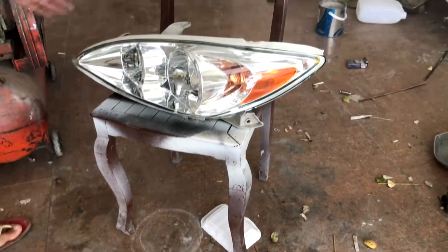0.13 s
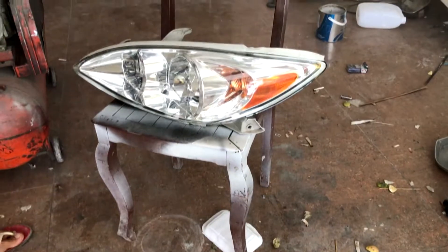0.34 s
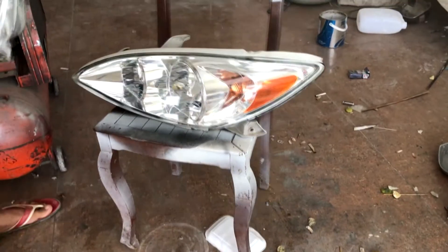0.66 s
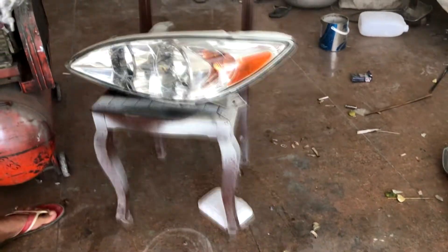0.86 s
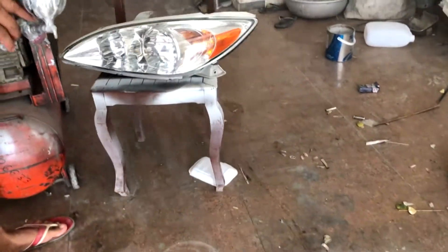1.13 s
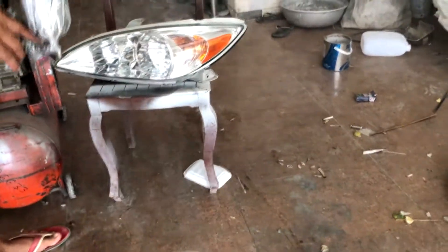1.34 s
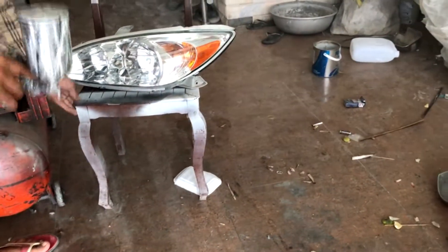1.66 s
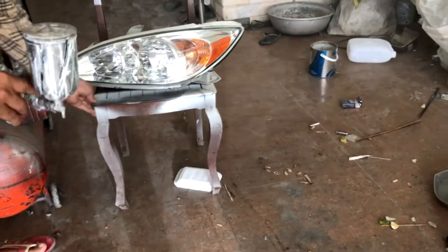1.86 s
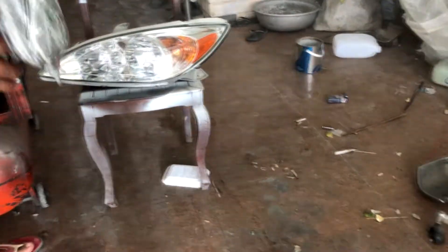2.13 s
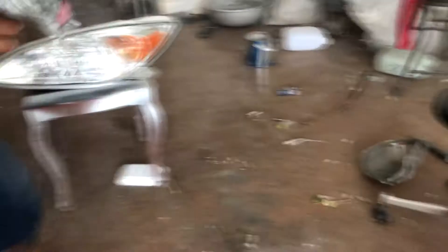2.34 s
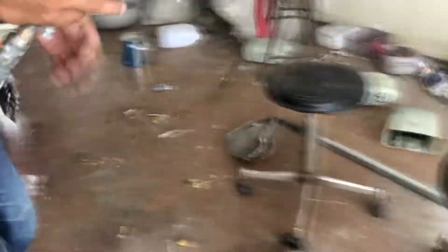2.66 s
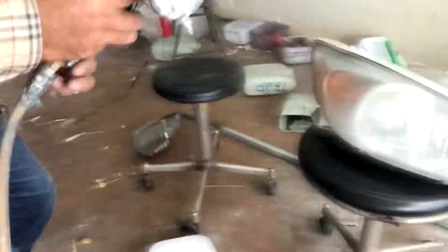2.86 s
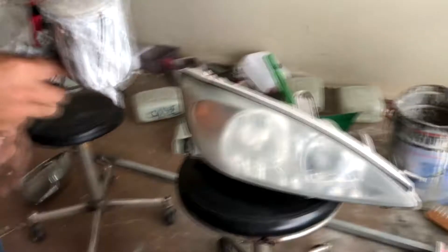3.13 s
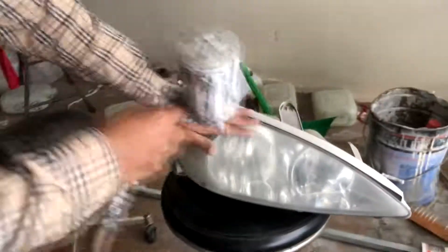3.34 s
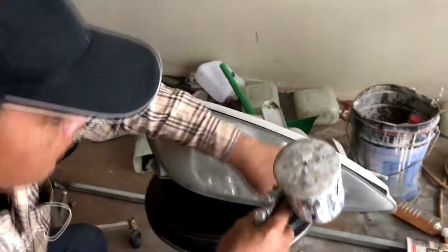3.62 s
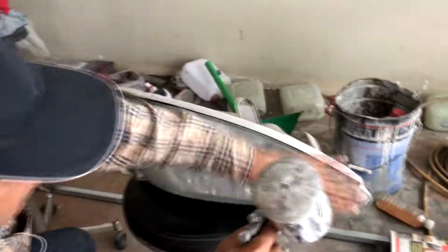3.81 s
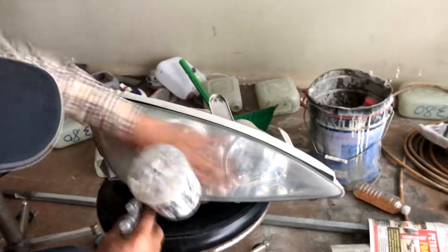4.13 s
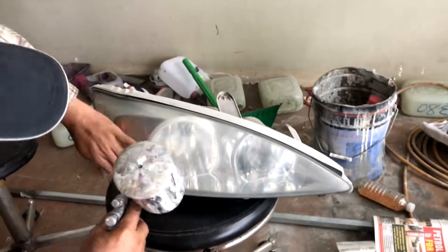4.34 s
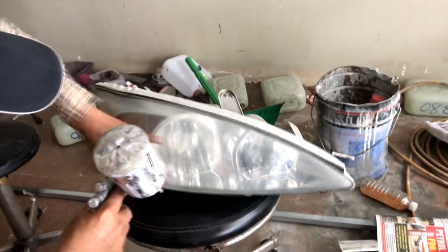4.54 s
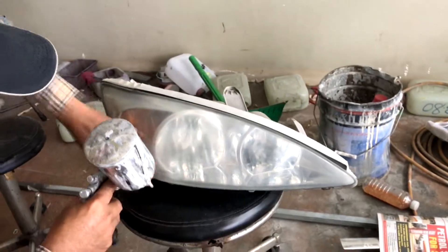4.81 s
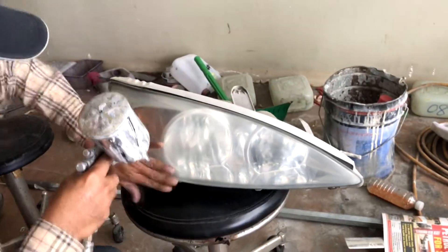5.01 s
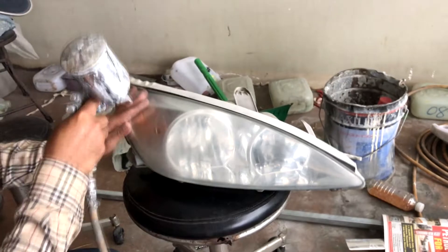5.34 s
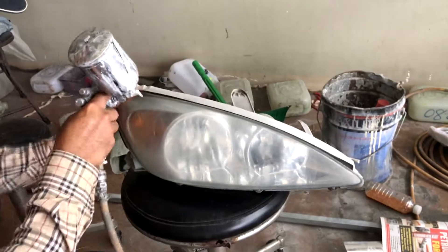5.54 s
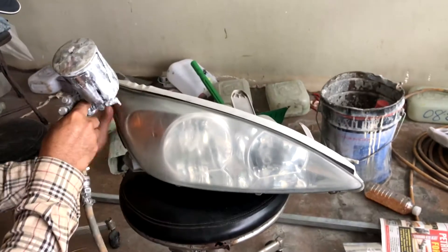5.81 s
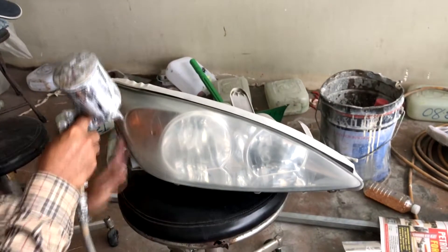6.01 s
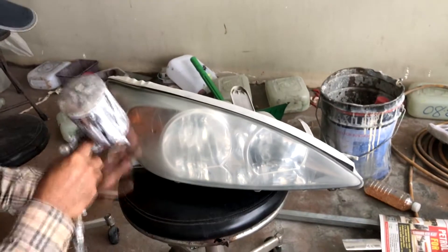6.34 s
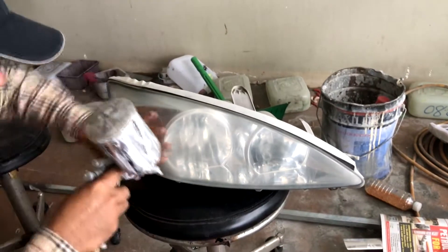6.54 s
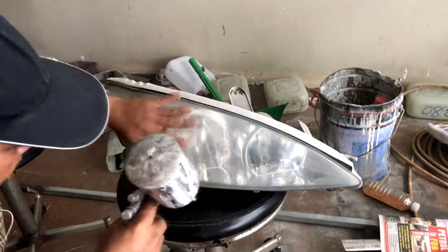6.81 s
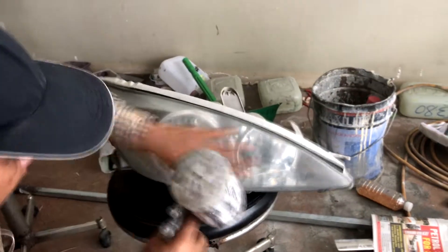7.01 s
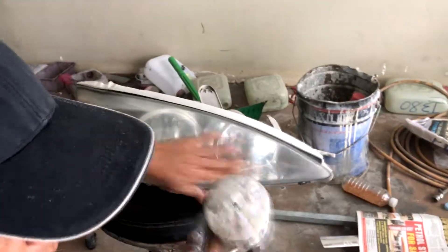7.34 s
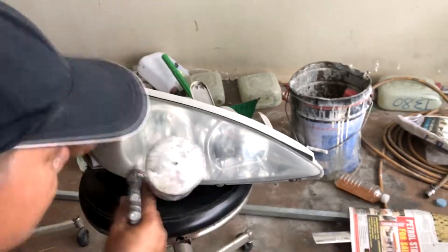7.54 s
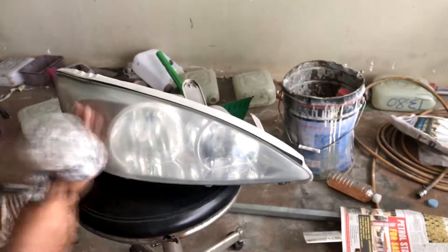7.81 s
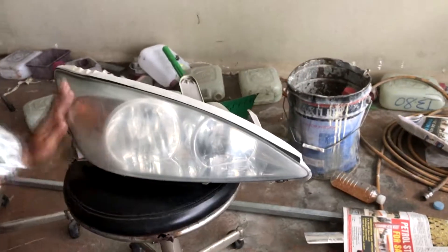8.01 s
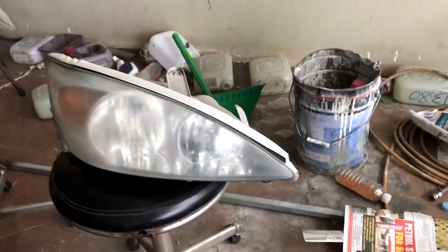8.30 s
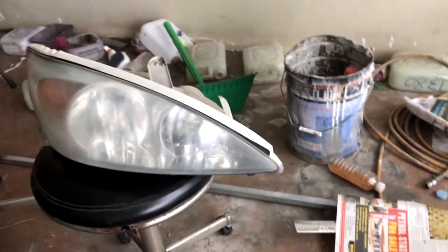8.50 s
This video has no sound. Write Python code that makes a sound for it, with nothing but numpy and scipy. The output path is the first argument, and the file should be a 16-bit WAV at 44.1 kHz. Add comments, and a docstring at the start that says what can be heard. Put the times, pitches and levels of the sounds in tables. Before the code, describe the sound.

A compressed-air spray gun hisses brightly and steadily close to the microphone in a workshop, coating a plastic headlamp lens, with a faint compressor hum and motor whine behind it. At about 2.1 seconds the trigger is released and the air falls away in a hollow sigh to a thin leak. A quiet low drone enters around 2.3 seconds and holds until about 5. At 2.8 seconds the air returns with a short spurt, slightly nearer and brighter, and hisses on to the end near 8.5 seconds, with a faint, high, breathy whistle flaring now and then. An engine outside swells into a low rumble around 3.5 seconds and fades around 6.2. The hiss grows a little fuller as the spray passes over the lens, from about 4 to 5.7 seconds and again from 6.8 seconds.

```python
"""A workshop, close on a compressed-air spray gun that hisses over a plastic headlamp lens; a compressor
hums behind. At 2.1 s the trigger is let go and the air sighs down to a thin leak, while a low drone comes
in and the microphone is carried a little nearer. At 2.8 s the air returns with a spurt, and from then on
the air cap's whistle flares now and then. An engine outside swells around 3.5 s and fades around 6.2 s;
the gun makes two more passes over the lens, from 4 s and from 6.8 s."""
import sys
import numpy as np
from scipy import signal
from scipy.fft import rfft, irfft
from scipy.io import wavfile
from scipy.ndimage import uniform_filter1d

SR = 44100
rng = np.random.default_rng(int(sys.argv[2]) if len(sys.argv) > 2 else 0)


def persist_wave(psi):
    """Save psi, clipped to +-1, as 16-bit WAV."""
    counts = np.round(np.clip(psi, -1, 1) * 32767).astype(np.int16)
    wavfile.write(sys.argv[1], SR, np.atleast_2d(counts).T)


N = 381888
TIME, ALL_HZ = np.arange(N) / SR, np.fft.rfftfreq(N, 1 / SR)
FRAME_S, BIN_HZ = np.arange(N // 128 + 5) * 128 / SR, np.fft.rfftfreq(512, 1 / SR)


def gain_of(db):
    """Decibels to amplitude."""
    return 10 ** (np.asarray(db) / 20)


def unit_rms(x):
    """Scales to rms 1."""
    return x / np.sqrt(np.mean(x ** 2) + 1e-20)


def spectrum_db(points, hz):
    """Reads a spectrum table along a log-frequency axis."""
    freq_hz, level_db = np.transpose(points)
    return np.interp(np.log(hz + 1), np.log(freq_hz), level_db)


def bells_db(rows, hz):
    """The curve of a set of bell-shaped peaks or dips."""
    return sum(db * np.exp(-.5 * ((hz - centre) / width) ** 2) for centre, width, db in rows)


def ease(t, middle_s, length_s):
    """A smooth step from 0 to 1."""
    return .5 + .5 * np.sin(np.pi * np.clip((t - middle_s) / length_s, -.5, .5))


def swell(t, middle_s, length_s):
    """A smooth arch from 0 to 1 and back."""
    return np.cos(np.pi * np.clip((t - middle_s) / length_s, -.5, .5)) ** 2


def noise(gain):
    """Noise of rms 1 with the given spectrum."""
    return unit_rms(irfft(rfft(rng.standard_normal(N)) * gain, N))


def drift(rate_hz):
    """A random wander of rms 1, up to about the given rate."""
    return noise(1 / (1 + (ALL_HZ / rate_hz) ** 2))


def tone(hz):
    """A complex tone that follows a pitch curve; its real part has rms 1."""
    return np.sqrt(2) * np.exp(2j * np.pi * (np.cumsum(hz * np.ones(N)) / SR + rng.random()))


def breathy(hz, width_hz):
    """A resonance blown by turbulence: a tone whose amplitude and phase wander."""
    return unit_rms((tone(hz) * (drift(width_hz / 2) + 1j * drift(width_hz / 2))).real)


def patches(frames, bins):
    """A random field, smoothed over time and frequency."""
    field = rng.standard_normal((len(FRAME_S), len(BIN_HZ)))
    for axis, size in enumerate((frames, bins)):
        field = uniform_filter1d(uniform_filter1d(field, size, axis), size, axis)
    return unit_rms(field)


def mic_position(t):
    """0 at the microphone's first, farther spot, 1 at the nearer one."""
    return ease(t, middle_s=2.55, length_s=.9)


# The bare jet, close up: freq_hz, relative_db
JET_SPECTRUM = [(100, -19), (450, -16), (900, -12.5), (1500, -10), (2100, -8.5), (2800, -4.5), (4200, -0.4),
                (5500, 0.26), (6500, 2.5), (8500, 2), (10000, 1.1), (11800, 0.85), (14000, -0.5),
                (16000, -2.5)]
# Resonances of the air cap: centre_hz, width_hz, gain_db
CAP_RESONANCES = [(1750, 200, 1), (2700, 150, 1), (4480, 130, 2.4), (5400, 150, 1), (8400, 200, 1),
                  (9600, 200, 1), (11600, 220, 1), (15300, 400, 1.3)]
# Passes over the lens: start_s, end_s, square_on_s, splash_factor
LENS_PASSES = [(-0.5, 2.3, 0.34, 1), (3.98, 5.67, 4.83, 1.04), (6.8, 8.56, 7.85, 0.99)]
# What the splash on the lens adds: freq_hz, gain_db
SPLASH_COLOUR = [(600, 5.5), (1700, 3), (4000, 1.5), (8500, 1.24), (13000, 3)]
# What striking it square on adds to that: freq_hz, gain_db
SQUARE_ON_COLOUR = [(1800, 0.2), (3200, 0.7), (4500, 2), (7000, 0.2), (13000, -0.6)]
# How the hiss changes with the microphone farther off: freq_hz, gain_db
FAR_COLOUR = [(600, -1.5), (1700, -0.5), (4000, -0.55), (8500, -1.34), (13000, -2)]
def jet(eddy_db=0.7, wander_db=0.67, sweep_s=0.86, bounce=0.023, beside_ms=1.5, over_ms=0.883):
    """Turbulent hiss: fuller where it strikes the lens, duller from farther away."""
    over_lens = sum(splash * (ease(FRAME_S, start, sweep_s) - ease(FRAME_S, end, sweep_s))
                    for start, end, _, splash in LENS_PASSES)
    square_on = sum(swell(FRAME_S, s, length_s=1) for _, _, s, _ in LENS_PASSES)
    far = 1 - mic_position(FRAME_S)
    field_db = eddy_db * patches(frames=4, bins=10) + wander_db * patches(frames=90, bins=3)
    field_db += spectrum_db(JET_SPECTRUM, BIN_HZ) + bells_db(CAP_RESONANCES, BIN_HZ)
    for amount, colour in ((over_lens, SPLASH_COLOUR), (square_on, SQUARE_ON_COLOUR), (far, FAR_COLOUR)):
        field_db += np.outer(amount, spectrum_db(colour, BIN_HZ))
    # a slower jet is duller, and the top flickers as the paint breaks up
    flicker = unit_rms(uniform_filter1d(rng.standard_normal(len(FRAME_S)), size=3))
    brightness = 0.36 * trigger(FRAME_S) - 0.1 * flicker
    field_db += np.outer(brightness, spectrum_db([(5500, -0.61), (9000, 0.25), (12500, 0.97)], BIN_HZ))
    # the bounce off the lens combs the hiss as the gun moves from beside it to over it
    delay_ms = beside_ms + (over_ms - beside_ms) * over_lens
    comb = 1 + bounce * np.exp(-2j * np.pi * np.outer(delay_ms, BIN_HZ) / 1000)
    white = rng.standard_normal(field_db.shape) + 1j * rng.standard_normal(field_db.shape)
    _, hiss = signal.istft((white * comb * gain_of(field_db)).T, nperseg=512, noverlap=384)
    return unit_rms(hiss[:N])


def spits(per_s=55, spread_db=2.4, relative_db=-22, decay_s=0.00027):
    """Droplets tear off the nozzle as tiny ticks."""
    sizes = gain_of(spread_db * np.minimum(rng.exponential(1, N), 4))
    droplets = sizes * (rng.random(N) < per_s / SR)
    envelope = signal.lfilter([1], [1, -np.exp(-1 / (decay_s * SR))], droplets)
    bursts = envelope * rng.standard_normal(N)
    ticks = irfft(rfft(bursts) * gain_of(spectrum_db(JET_SPECTRUM, ALL_HZ)), N)
    return gain_of(relative_db) * unit_rms(ticks)


# Flares of the air cap's whistle: middle_s, length_s, pitch_hz, relative_db
WHISTLE_FLARES = [(3.079, 1.26, 6880, -11), (3.678, .3, 6454, -16), (4.05, .9, 6890, -11.5),
                  (5.62, .35, 6760, -11), (5.875, .6, 6940, -14.5), (6.55, .25, 7290, -14),
                  (7.08, .45, 6740, -11), (8.5, 0.37, 6816, -15.5)]
def whistle(resting_hz=6910, resting_db=-21.5, width_hz=280, waver=.006):
    """A faint breathy tone at the air cap; each flare lifts it and pulls it toward its own pitch."""
    parts = [(gain_of(db) * swell(TIME, s, length), hz) for s, length, hz, db in WHISTLE_FLARES]
    parts.append((gain_of(resting_db), resting_hz))
    amplitude = sum(gain for gain, _ in parts)
    pitch_hz = sum(gain * hz for gain, hz in parts) / amplitude
    return amplitude * breathy(pitch_hz * (1 + waver * drift(5.0)), width_hz)


def spray_gun(gain_db=-32, hiss_boost_db=1.71, flutter_db=0.15):
    """Close to the microphone: hiss, whistle and ticks all follow the air flow."""
    flow_db = gain_db + trigger(TIME) + flutter_db * drift(18)
    return gain_of(flow_db) * (gain_of(hiss_boost_db) * jet() + whistle() + spits())


# The compressor's hum, behind the gun: crank_multiple, relative_db
HUM_HARMONICS = [(5, -54), (6, -62), (10, -77), (12, -61.5), (13, -66), (14, -68), (15, -62.5), (16, -51.5),
                 (17, -61), (19, -61.5), (21, -66), (22, -68.5), (24, -70), (25, -78), (29, -83),
                 (35, -69.5)]
# Its motor's whine: pitch_hz, relative_db
MOTOR_WHINE = [(713, -13), (901, -3.5), (940, -0.5), (956, -3.5)]
def compressor(crank_hz=16.1, scatter_hz=0.35, hum_db=-1.76, first_spot_db=-63.5, second_spot_db=-67.5):
    """Crank harmonics and a motor whine waver in the room; the whine drops as the microphone moves."""
    speed_hz = crank_hz * (1 + 0.00099 * drift(1.98))
    hum = sum(gain_of(db + 1.3 * drift(2.7)) * tone(k * speed_hz + scatter_hz * drift(2.18)).real
              for k, db in HUM_HARMONICS)
    whine = sum(gain_of(db + 4.5 * drift(4.9)) * tone(hz * (1 + 0.004 * drift(12.0))).real
                for hz, db in MOTOR_WHINE)
    whine_db = first_spot_db + (second_spot_db - first_spot_db) * mic_position(TIME)
    return gain_of(hum_db) * hum + gain_of(whine_db) * whine


# The workshop's background at the microphone: freq_hz, relative_db
ROOM_SPECTRUM = [(20, -36), (42, -9.5), (65, -4.5), (90, 1.5), (120, -5), (200, -9), (300, -12.5),
                 (450, -22.5), (700, -19), (1100, -21), (2100, -20), (5000, -34), (10500, -39),
                 (16000, -56)]
def room_tone(level_db=-48, waver_db=1.6):
    """Street rumble and room air, gently wavering."""
    return gain_of(level_db + waver_db * drift(4.4)) * noise(gain_of(spectrum_db(ROOM_SPECTRUM, ALL_HZ)))


def trigger(t, shut_s=2.097, shutting_s=0.036, bleed_s=0.32, open_s=2.779, rise_s=0.029, settle_s=0.034):
    """Air flow in dB: it drops and bleeds away on release; on reopening, stored pressure overshoots."""
    since_shut = np.maximum(t - shut_s, 0)
    drop_db = -4 * np.minimum(since_shut / shutting_s, 1)
    bleed_db = -28 * (1 - np.exp(-since_shut / bleed_s))
    opened = np.clip((t - open_s) / rise_s, 0, 1)
    since_open = np.maximum(t - open_s - rise_s, 0)
    spurt_db = 5.5 * np.exp(-since_open / settle_s)
    return (1 - opened) * (drop_db + bleed_db) + opened * spurt_db


# Air leaking past the valve, heard close up in the pause: pitch_hz, width_hz, level_db
LEAK_BANDS = [(1772, 180, -63.5), (2623, 1000, -61), (3900, 1000, -65), (6340, 900, -66), (8160, 260, -63),
              (9000, 340, -68)]
def valve(middle_s=2.25, length_s=.52, sigh_db=-49.5, sigh_hz=969, octaves_per_s=-2.6):
    """A hollow, falling sigh as the valve shuts, over a steady leak."""
    leak = sum(gain_of(db) * breathy(hz, width) for hz, width, db in LEAK_BANDS)
    pitch_hz = sigh_hz * 2 ** (octaves_per_s * np.clip(TIME - middle_s, -length_s, length_s))
    sigh = swell(TIME, middle_s, length_s) * breathy(pitch_hz, width_hz=540)
    return gain_of(sigh_db) * sigh + leak


def drone(pitch_hz=151, level_db=-52.5, start_s=2.32, end_s=4.98, fade_s=.3):
    """A low tone comes and goes in the background."""
    envelope = ease(TIME, start_s, fade_s) - ease(TIME, end_s, fade_s)
    return gain_of(level_db) * envelope * tone(pitch_hz * (1 + 0.0011 * drift(4.4))).real


# The speed of the engine outside: time_s, firing_hz
ENGINE_SPEED = [(0, 20.1), (3.2, 19.0), (3.8, 19.2), (4.1, 20.6), (4.7, 21.0), (5.4, 20.2), (6.2, 19.6),
                (8.66, 18)]
# Its exhaust, heard from indoors: freq_hz, relative_db
EXHAUST_SPECTRUM = [(20, -38), (42, -17), (62, -10), (82, -2.5), (100, 5), (125, -2), (165, -5),
                    (220, -12.5), (320, -15.5), (600, -17.5), (1500, -34), (5000, -57)]
def engine(far_db=-52.5, near_db=-42.5, arrive_s=3.5, leave_s=6.17, fade_s=1.8, waver_db=2.0):
    """Firing harmonics through the exhaust over a rough rumble; it comes close, then draws off."""
    firing_hz = np.interp(TIME, *np.transpose(ENGINE_SPEED)) * (1 + 0.0057 * drift(5.9))
    near = ease(TIME, arrive_s, fade_s) - ease(TIME, leave_s, fade_s)
    harmonics = np.zeros(N)
    for k in range(2, 15):
        harmonic_db = spectrum_db(EXHAUST_SPECTRUM, k * firing_hz) + waver_db * drift(2.6)
        harmonics += gain_of(harmonic_db) * tone(k * firing_hz).real
    rumble = noise(gain_of(spectrum_db(EXHAUST_SPECTRUM, ALL_HZ)))
    return gain_of(far_db + (near_db - far_db) * near) * (unit_rms(harmonics) + 0.42 * rumble)


def walls(x, count=14, wet=0.16):
    """Floor, wall and clutter send a handful of early echoes back to the microphone."""
    delays = (SR * np.geomspace(.003, .03, count) * rng.uniform(.9, 1.1, count)).astype(int)
    taps = np.zeros(delays.max() + 1)
    taps[delays] = rng.choice([-1., 1.], count) / np.sqrt(delays)
    return x + wet * signal.oaconvolve(x, taps / np.linalg.norm(taps))[:N]


def scene():
    """Gun close, compressor behind, engine outside: one microphone, the same in both channels."""
    mono = walls(spray_gun() + valve()) + compressor() + engine() + room_tone() + drone()
    return np.array([mono, mono])


# Dips in the microphone's response: centre_hz, width_hz, gain_db
MIC_RESPONSE = [(4680, 450, -2), (7720, 320, -3), (10350, 320, -3.5)]
def record(dry):
    """The microphone colours the treble, and the band ends at 15.8 kHz."""
    coloured = irfft(rfft(dry) * gain_of(bells_db(MIC_RESPONSE, ALL_HZ)), N)
    lowpass = signal.firwin(511, 15800, window=("kaiser", 9), fs=SR)
    return signal.oaconvolve(coloured, lowpass[None], "same")


dry = scene()
out = record(dry)
persist_wave(out)
```